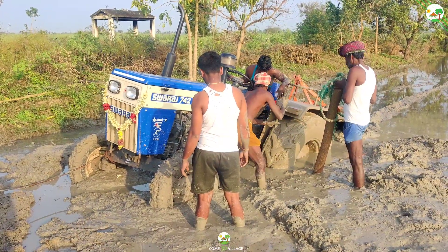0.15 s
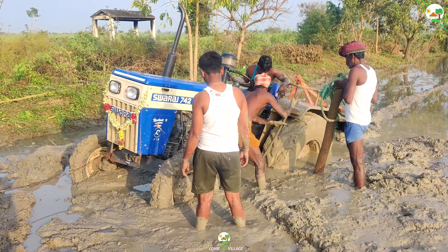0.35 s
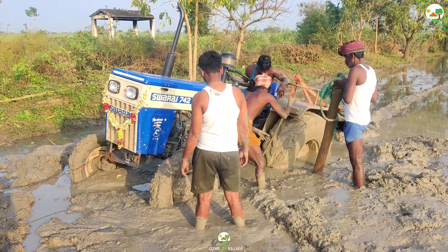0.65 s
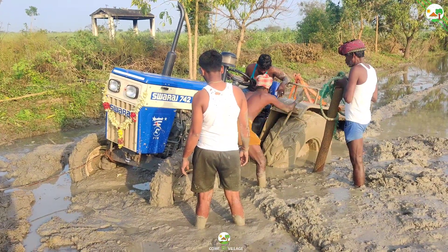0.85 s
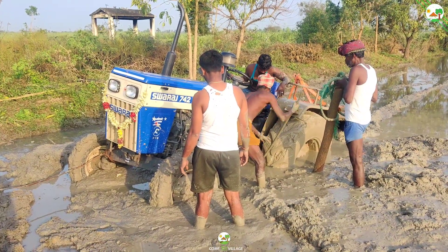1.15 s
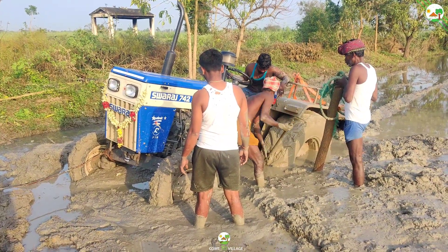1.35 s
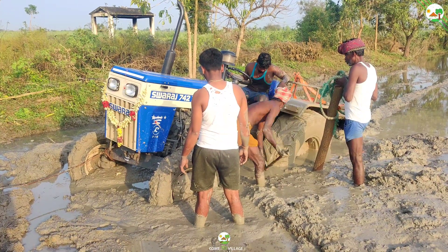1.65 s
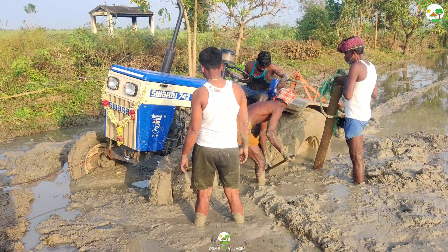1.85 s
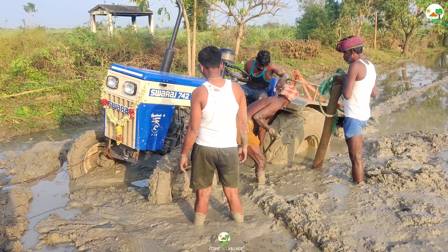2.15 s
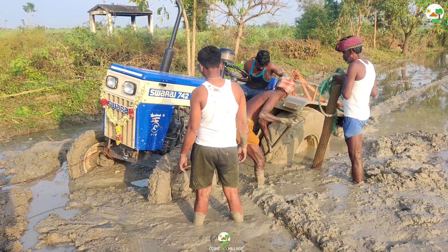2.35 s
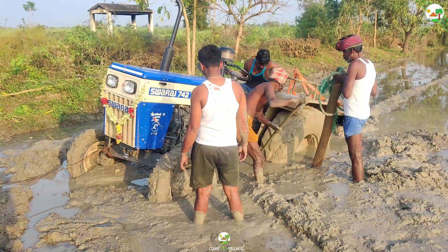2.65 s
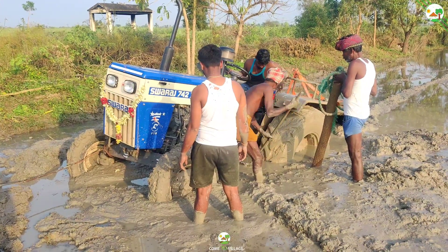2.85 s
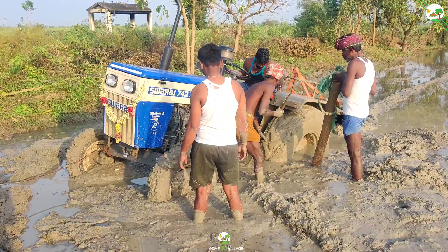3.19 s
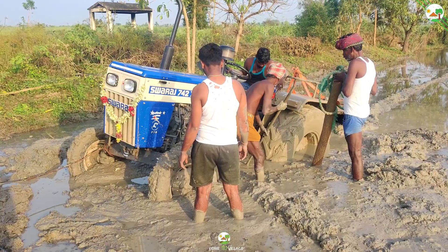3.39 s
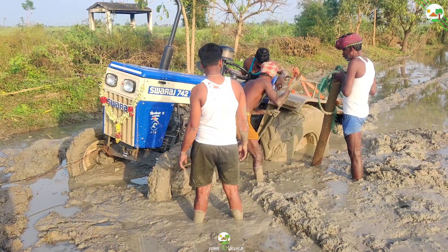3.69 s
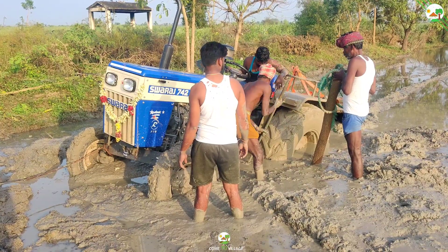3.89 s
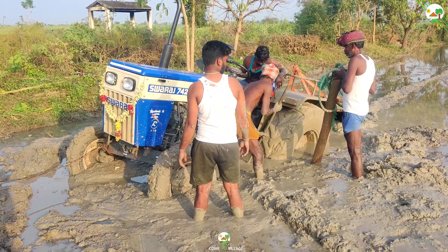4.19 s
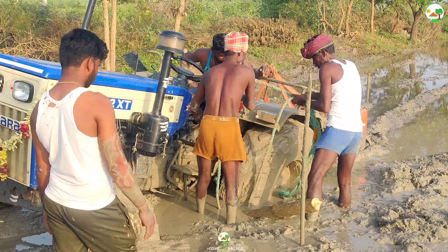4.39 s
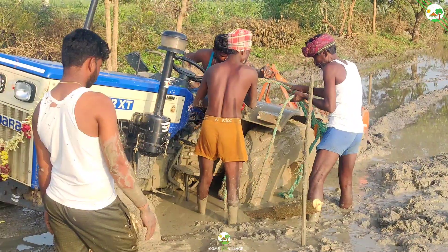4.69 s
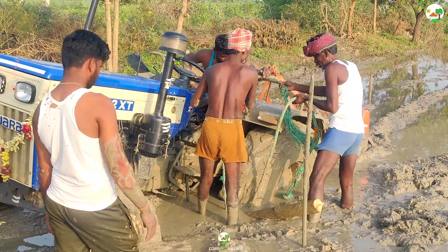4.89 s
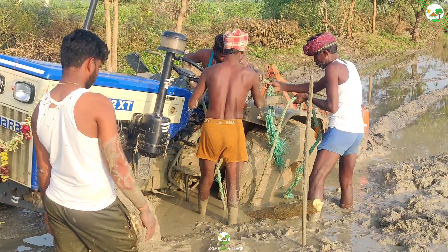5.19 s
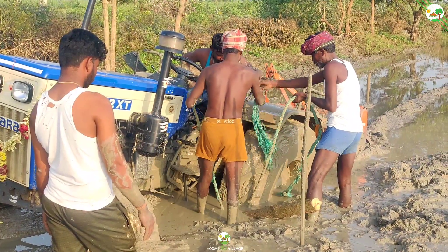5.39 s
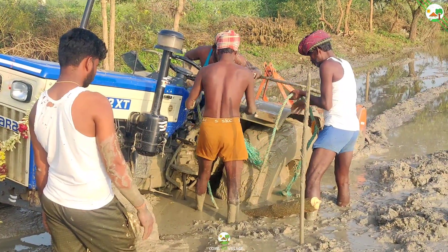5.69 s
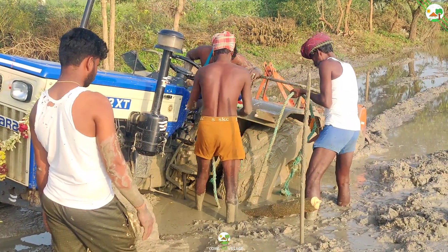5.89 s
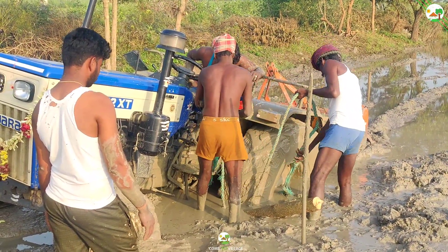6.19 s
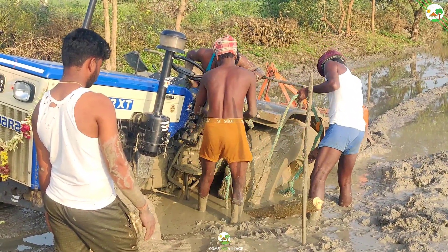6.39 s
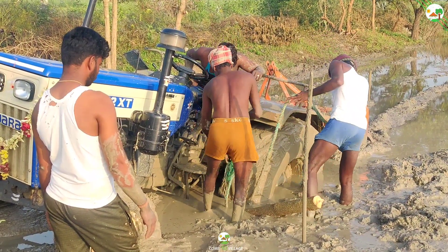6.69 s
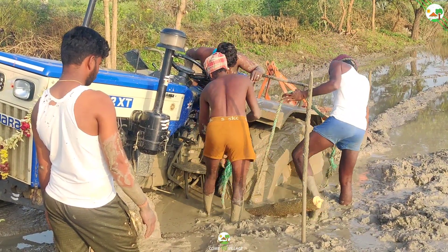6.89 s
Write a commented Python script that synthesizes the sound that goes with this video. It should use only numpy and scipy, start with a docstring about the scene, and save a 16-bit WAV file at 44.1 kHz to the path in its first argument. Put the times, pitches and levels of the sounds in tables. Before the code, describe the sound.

Mud squelches, metal clatters twice and water splashes in a breezy field; after a brief dropout and click, crickets and birds chirp.

```python
"""A stuck tractor in a muddy evening field

Mud plops as its cavities close, flung water hisses, and a loose metal part rattles in its own modes.
Crickets stroke their wings, small birds whistle among a few quick drip-like glides, and a far bird hoots
over a murmur, a rustle and a hum. Light wind buffets a phone's two microphone ports. The sound fades out
briefly, then returns while the microphones' bias swings and settles."""
import sys
import numpy as np
from scipy import signal
from scipy.fft import rfft, irfft, next_fast_len
from scipy.io import wavfile
from scipy.ndimage import uniform_filter1d, map_coordinates

SR = 44100
rng = np.random.default_rng(int(sys.argv[2]) if len(sys.argv) > 2 else 0)


def store_pcm(level_fs):
    """Save levels as 16-bit WAV."""
    pcm = np.round(np.clip(level_fs, -1, 1) * 32767).astype(np.int16)
    wavfile.write(sys.argv[1], SR, np.atleast_2d(pcm).T)


N = 310756

# Coherence of diffuse sound between the two ports: frequency_hz, correlation
DIFFUSE_COHERENCE = [(60, 0.99), (180, 0.93), (550, 0.26), (1650, -0.075), (4970, -0.028), (15000, -0.044)]
# Slow course of the background: time_s, breeze_db, murmur_db, rustle_db
BACKGROUND_LEVELS = [(0, -56, -54, -57.5), (.6, -54.5, -54, -57.5), (1.3, -57, -56, -58),
                     (1.55, -56, -55, -55), (1.9, -54, -56, -58.5), (2.6, -49, -55.5, -56.5),
                     (3.2, -50, -53.5, -53.5), (3.6, -51, -56, -57.5), (4.1, -43, -53, -54),
                     (4.35, -55, -53, -55), (4.6, -49, -54.5, -56), (5.05, -48, -52, -54),
                     (5.45, -50, -49, -53.5), (5.8, -49.5, -54, -54), (5.87, -57.5, -55, -58.5),
                     (6.5, -50.5, -56.5, -59), (7.05, -53, -54, -59)]


def amp(db):
    """Decibels as an amplitude ratio."""
    return 10 ** (np.asarray(db) / 20)


def unit(x):
    """Scales to an rms of 1."""
    return x / np.sqrt(np.mean(x ** 2) + 1e-20)


def along(points, hz):
    """Interpolates (frequency_hz, value) points on a log frequency axis."""
    knots_hz, values = np.transpose(points)
    return np.interp(np.log(hz + 1), np.log(knots_hz + 1), values)


def curves(rows, outside=None):
    """One value per sample for each column after the time."""
    times_s, *columns = np.transpose(rows)
    return [np.interp(np.arange(N) / SR, times_s, column, outside, outside) for column in columns]


def wobble(rate):
    """A smooth random curve, rate knots a second."""
    return map_coordinates(rng.standard_normal(int(N * rate / SR) + 4), [np.arange(N) * rate / SR])


def swell(start_s, rise_s, hold_s, fall_s):
    """Gain 1 from start_s for hold_s; 20 dB lower rise_s before and fall_s after."""
    t = np.arange(N) / SR - start_s
    return amp(-20 * np.maximum(0, np.maximum(-t / rise_s, (t - hold_s) / fall_s)))


def filtered(x, response):
    """Linear filtering: the spectrum times a complex frequency response."""
    size = next_fast_len(N + SR // 2)
    return irfft(rfft(x, size) * response(np.fft.rfftfreq(size, 1 / SR)), size)[..., :N]


def rush(spectrum, coherence, patchy_db):
    """Partly coherent stereo noise of rms 1, with patches of random gain in time and frequency."""
    cells = signal.stft(rng.standard_normal((2, N)), nperseg=512)[2]
    patches = uniform_filter1d(uniform_filter1d(rng.standard_normal(cells.shape[1:]), 6, 0), 8, 1)
    pair = signal.istft(cells * amp(patchy_db * unit(patches)), nperseg=512)[1][:, :N]
    turn = lambda hz: np.arccos(np.clip(along(coherence, hz), -1, 1)) / 2
    mid, side = filtered(pair, lambda hz: amp(along(spectrum, hz)) * [np.cos(turn(hz)), np.sin(turn(hz))])
    return unit(np.array([mid + side, mid - side]))


def add(out, start_s, sound, pan_db=0, lag=0):
    """Places a sound in both ports; the left one hears it lag samples later."""
    for side, (gain, shift) in enumerate([(amp(pan_db / 2), lag), (amp(-pan_db / 2), 0)]):
        span = out[side, round(start_s * SR) + shift:][:np.shape(sound)[-1]]
        span += gain * (sound if np.ndim(sound) == 1 else sound[side])[:len(span)]


def wind():
    """Turbulent pressure buffets the ports; a gust may strike one harder than the other."""
    spectrum = [(7.1, -21), (12, 6), (46, 7.5), (102, -12.5), (136, -17.5), (178, -14), (200, -18),
                (260, -54), (440, -120)]  # wind on a port: frequency_hz, density_db
    gusts = [(0.028, -47, 0.5, 0.043), (0.907, -50, 1, .01), (1.461, -43, 13, 0.019),
             (1.697, -49.5, -9, .04), (2.04, -41.5, -15, 0.031), (2.376, -45, -14, 0.051),
             (2.722, -40.5, -11.5, 0.035), (3.132, -45, -8.5, 0.054), (3.338, -48, -9, 0.019),
             (3.722, -38, -18.5, 0.024), (3.84, -42.5, 0, 0.14), (4.763, -44.5, 2.5, 0.073),
             (5.68, -47, 1, .06), (6.8, -53, -1, .05)]  # start_s, peak_db, left_minus_right_db, hold_s
    breeze_db, _, _ = curves(BACKGROUND_LEVELS)
    lumps = amp(1.5 * np.array([wobble(17), wobble(12)]))
    gust_gain = sum(amp(db + np.array([[pan_db], [-pan_db]]) / 2) * swell(start_s, 0.072, hold_s, 0.17)
                    for start_s, db, pan_db, hold_s in gusts)
    buffet = unit(lumps * rush(spectrum, coherence=[(20, 0.64), (120, 0.84)], patchy_db=0.64))
    return buffet * np.maximum(amp(breeze_db), gust_gain)


def murmur_and_rustle():
    """A diffuse sound field: a low murmur, and the rustle of leaves and wet mud."""
    murmur_spectrum = [(41, -17.5), (70, -0.5), (94, -1), (145, -6.5), (188, -8), (335, -15), (444, -19.5),
                       (479, -22), (800, -26), (1500, -36.5), (1950, -79), (3300, -120)]  # frequency_hz, density_db
    rustle_spectrum = [(410, -33.5), (700, -3.5), (969, -6.5), (1090, -11), (1700, -8), (2820, -7.5),
                       (4800, -6), (5760, -6.5), (7100, -7), (7700, -3), (8300, -8), (8800, -12),
                       (11500, -14), (14900, -11), (15700, -8.5)]  # frequency_hz, density_db
    _, murmur_db, rustle_db = curves(BACKGROUND_LEVELS)
    murmur = amp(murmur_db + 0.67 * wobble(10)) * rush(murmur_spectrum, DIFFUSE_COHERENCE, patchy_db=2.5)
    rustle = amp(rustle_db + 0.4 * wobble(14)) * rush(rustle_spectrum, DIFFUSE_COHERENCE, patchy_db=2.5)
    return murmur + rustle


def crickets():
    """Stridulation: two wing strokes a chirp, blurred by the grass; far crickets merge into a hiss."""
    chorus = [(5600, -44), (6050, -0.5), (6280, -2), (6450, -3), (6600, -9), (6770, -15), (7000, -24),
              (7400, -41)]  # far crickets: frequency_hz, density_db
    singers = [(.03, 4.2, .1705, 6750, -66.5, 0), (.085, 4.2, .18, 6480, -64.5, 0),
               (.035, 4.2, .175, 6230, -67, 0), (4.385, 7.0, .173, 6300, -59, -1.5),
               (4.435, 7.0, .169, 6770, -61, -2.5), (4.525, 5.05, .157, 6780, -61, 0),
               (4.49, 7.0, .168, 6440, -64, -2.5)]  # near crickets: start_s, end_s, period_s, pitch_hz, level_db, drift_db_per_s
    out = amp(-71 + 1.6 * wobble(20)) * rush(chorus, [(1000, 0.0059)], patchy_db=3.0)
    t = np.arange(round(.034 * SR)) / SR
    for start_s, end_s, period_s, hz, db, drift in singers:
        for chirp_s in np.arange(start_s, end_s, period_s):
            for gap_s in (0, .044):
                blur = np.cumsum(rng.normal(0, .035, (2, len(t))), axis=1)
                phase = 2 * np.pi * hz * t + blur + rng.uniform(0, 2, (2, 1))
                onset_s = chirp_s - .017 + gap_s + rng.normal(0, .003)
                gain = amp(db + drift * (chirp_s - start_s) + rng.normal(0, 2))
                add(out, onset_s, gain * np.sqrt(np.hanning(len(t))) * np.sin(phase), pan_db=-6)
    return out


def spray():
    """Flung water: countless drops sum to a flickering hiss, with the heavier slop under it."""
    splashes = [(0.023, -46.5, -46, 0.067, .015, 0.066), (3.154, -34, -61, .004, 0.008, 0.053),
                (3.225, -39.5, -73.5, 0.045, 0.0044, 0.1), (3.256, -44.5, -45.5, .015, 0.024, 0.013)]  # start_s, hiss_db, slop_db, rise_s, hold_s, fall_s
    mist_spectrum = [(880, -17), (1500, -16), (2300, -8.5), (2980, -2.5), (4210, -2), (5990, -2.5),
                     (9800, -9), (15700, -6)]  # frequency_hz, density_db
    slop_spectrum = [(120, -18), (250, 7), (500, -6), (1000, -8), (2200, -14.5), (4000, -28)]  # frequency_hz, density_db
    hiss_gain, slop_gain = sum(amp([[hiss_db], [slop_db]]) * swell(start_s, *shape)
                               for start_s, hiss_db, slop_db, *shape in splashes)
    hiss = rush(mist_spectrum, [(1000, 0.0093)], patchy_db=2.0) * amp(1.2 * wobble(250))
    slop = rush(slop_spectrum, DIFFUSE_COHERENCE, patchy_db=1.8)
    return hiss_gain * hiss + slop_gain * slop


def mud_plops():
    """Cavity resonance: a closing pocket rings briefly; mud squelches, spatters and lands with a thud."""
    plops = [(.033, -42, 260, .12, -58, -70), (0.323, -30, 1076, 0.024, -43, -54.5),
             (.495, -53, 4560, .02, -53.5, -70), (.678, -24, 1710, .022, -45, -50.5),
             (.692, -38, 1560, .05, -53, -65), (.784, -56, 2140, 0.067, -62, -66),
             (.865, -56, 4980, .012, -54.5, -54.5), (.895, -53, 810, .025, -74, -54),
             (1.047, -37, 1070, 0.02, -49.5, -52.5), (1.52, -47, 2170, 0.027, -45.5, -67),
             (1.528, -46, 251, 0.13, -60, -75), (1.916, -40.5, 1080, 0.033, -56.5, -69),
             (2.14, -49, 4670, 0.022, -60, -62), (2.674, -44, 773, .045, -70, -74),
             (2.8, -45, 1310, .025, -55, -63), (3.255, -40.5, 251, 0.13, -57, -70),
             (3.437, -51, 900, .026, -75, -61), (4.17, -40, 4400, 0.016, -47, -58),
             (5.154, -47, 715, .014, -55, -47), (5.393, -46, 4480, .01, -52, -66),
             (5.505, -47, 810, .02, -55, -62)]  # start_s, note_db, pitch_hz, note_t60_s, squelch_db, spatter_db
    thuds = [(.865, -55), (.895, -52.5), (1.52, -46), (2.799, -64), (5.393, -56), (5.505, -53.5)]  # heavy mud landing: start_s, level_db
    out, t = np.zeros((2, N)), np.arange(SR // 5) / SR
    noise = lambda: rng.standard_normal(len(t)) + rng.standard_normal((2, len(t)))  # shared + each port's
    band = lambda *hz: unit(signal.sosfilt(signal.butter(2, hz, "band", fs=SR, output="sos"), noise()))
    decay = lambda t60_s: amp(-60 * t / t60_s) * (1 - np.exp(-t / 0.00057))
    for start_s, db, hz, t60_s, squelch_db, spatter_db in plops:
        note = amp(db) * np.sin(2 * np.pi * hz * t) * decay(t60_s)
        squelch = amp(squelch_db) * band(0.45 * hz, 2.15 * hz) * decay(t60_s=.12)
        spatter = amp(spatter_db) * band(2500, 20000) * decay(t60_s=.15)
        add(out, start_s, note + squelch + spatter, lag=-17)
    for start_s, db in thuds:
        add(out, start_s, amp(db) * band(100, 540) * decay(t60_s=0.17), lag=-17)
    return out


def hooting_bird():
    """A far bird hoots in phrases of up to five damped tones, each sagging slightly in pitch."""
    phrase = [(0, -56), (.335, -58.5), (.65, -55.5), (.985, -56), (1.305, -53)]  # the hoots of a phrase: offset_s, level_db
    phrase_starts_s, end_s, pitch_hz = [.228, 1.94, 3.668], 4.2, 450
    out, t = np.zeros((2, N)), np.arange(round(.15 * SR)) / SR
    envelope = amp(-60 * t / .5) * np.sin(np.pi * t / t[-1]) ** 0.16
    phase = 2 * np.pi * pitch_hz * t * (1 - 0.095 * t)
    for start_s in phrase_starts_s:
        for offset_s, db in phrase:
            if start_s + offset_s < end_s:
                blur = np.cumsum(rng.normal(0, .03, len(t)))
                add(out, start_s + offset_s, amp(db) * envelope * np.sin(phase + blur), lag=-11)
    return out


def hum():
    """A low tone wavers by slow random modulation of frequency and amplitude."""
    levels = [(0.85, -70), (0.958, -56), (1.942, -69), (1.998, -60), (2.7, -61)]  # time_s, level_db
    level_db, = curves(levels, outside=-120)
    pitch_hz = 183 + 4 * wobble(6)
    return amp(level_db + 2.5 * wobble(8)) * np.sin(2 * np.pi * np.cumsum(pitch_hz) / SR)


def whistles_and_blips():
    """Frequency sweeps, roughened and echoed: bird whistles and a few quick bubble- or drip-like glides."""
    glides = [(.868, .02, 4500, 3780, -61), (1.2, .03, 4600, 3160, -62), (1.562, .028, 4600, 4240, -58),
              (1.58, 0.16, 7600, 5740, -61), (2.386, 0.022, 4940, 4980, -56.5),
              (2.465, .02, 4500, 4800, -60), (2.532, .025, 4660, 5020, -63), (2.566, .011, 3120, 2160, -54),
              (2.612, .009, 2860, 2260, -55.5), (2.679, 0.0082, 2380, 3740, -50.5),
              (2.73, 0.022, 4600, 4650, -60), (2.805, 0.024, 5050, 5320, -54),
              (2.886, 0.013, 3500, 4530, -52.5), (2.909, 0.047, 4700, 5060, -56),
              (3.32, .038, 7800, 7050, -55), (4.669, .087, 2900, 3200, -61), (5.393, .035, 4400, 4750, -56),
              (4.75, .04, 3150, 2680, -62), (5.95, .32, 4940, 5600, -67)]  # whistles and drip-like blips: start_s, length_s, start_hz, end_hz, level_db
    calls = [(4.594, -55.5, -53), (4.86, -57, -52), (5.141, -68, -47), (5.42, -62, -53), (5.71, -57, -54.5)]  # a two-note bird: start_s, rising_db, falling_db
    rising, falling = (0.021, 4200, 4850), (.018, 6700, 4700)  # length_s, start_hz, end_hz
    out, notes = np.zeros((2, N)), list(glides)
    for start_s, rising_db, falling_db in calls:
        notes += [(start_s, *rising, rising_db), (start_s + .047, *falling, falling_db)]
    for start_s, length_s, start_hz, end_hz, db in notes:
        hz = np.linspace(start_hz, end_hz, round(length_s * SR))
        for delay_s, echo_db in [(0, 0), (.009, -13)]:
            blur = np.cumsum(rng.normal(0, .05, (2, len(hz))), axis=1)
            glide = np.sqrt(np.hanning(len(hz))) * np.sin(2 * np.pi * np.cumsum(hz) / SR + blur)
            add(out, start_s + delay_s, amp(db + echo_db) * glide)
    return out


def rattle():
    """Modal ringing: small contacts and harder knocks excite the loose metal part; its edge scrapes."""
    modes = [(876, 127, 0), (1540, 96, -1), (1870, 115, -2), (2670, 130, 0), (3250, 150, -2.5),
             (3770, 140, -3.5), (5040, 100, -14), (7600, 300, -12)]  # the part's resonances: centre_hz, width_hz, level_db
    shakes = [(3.04, -43, -40.5, 0.038, 0.086), (3.986, -55, -46.5, .003, .03),
              (4.041, -40.5, -34, 0.042, 0.054)]  # peak_s, rattle_db, scrape_db, rise_s, fall_s
    knocks = [(2.999, -41, 876), (3.026, -42, 876), (3.037, -29, 2670), (3.04, -36, 876),
              (3.069, -39, 1540), (3.076, -33, 2670), (3.105, -47, 876), (3.157, -28.5, 2670),
              (3.159, -33, 5040), (3.985, -38, 876), (3.987, -38.5, 5040), (4.026, -31, 876),
              (4.031, -36, 1540), (4.032, -33.5, 1870), (4.035, -31.5, 2670), (4.046, -30, 3250),
              (4.067, -54, 876), (4.112, -49, 876), (4.115, -54, 1870)]  # start_s, level_db, struck_mode_hz
    scrape_spectrum = [(500, -42.5), (1000, -18), (2000, -4), (4000, 2.5), (8000, -3.5), (12000, -7),
                       (15700, -6)]  # frequency_hz, density_db
    shake_gain, scrape_gain = sum(amp([[rattle_db], [scrape_db]]) * swell(peak_s, rise_s, 0, fall_s)
                                  for peak_s, rattle_db, scrape_db, rise_s, fall_s in shakes)
    ring = lambda f: sum((-1) ** k * amp(db) * 1j * f * width / (hz * hz - f * f + 1j * f * width)
                         for k, (hz, width, db) in enumerate(modes))
    forces = rng.standard_normal(N) + 0.49 * rng.standard_normal((2, N))
    contacts = forces * (rng.random(N) < .03)
    chatter = filtered(shake_gain * contacts / np.std(filtered(contacts, ring)), ring)
    out = scrape_gain * rush(scrape_spectrum, [(1000, 0)], patchy_db=1.0)
    add(out, 0, chatter, lag=1)
    t = np.arange(SR // 10) / SR
    attack = 1 - np.exp(-t / 0.00081)
    for start_s, db, struck_hz in knocks:
        ringing = 0
        for hz, width, _ in modes:
            gain = amp(rng.normal(0, 1.1) - 31.4 * abs(np.log2(hz / struck_hz)))  # far modes are weaker
            ringing += gain * np.exp(-np.pi * .75 * width * t) * np.sin(2 * np.pi * hz * t)
        add(out, start_s, amp(db) * attack * ringing, lag=1)
    return out


def bias_settling():
    """Transient response: each microphone's bias wakes with a step, swings and creeps back to rest."""
    # left, right: wake_s, step_size, swing_size, swing_decay_s, swing_hz, creep_size, creep_decay_s
    ports = [(4.4492, .008, .34, .299, .85, .173, .4), (4.4598, .013, 1.39, .091, 1.815, .44, .25)]
    settle_s, lift_s, drop_s = 4.474, 4.505, 4.5231
    t = np.arange(N) / SR
    age, out = np.maximum(t - settle_s, 0), []
    for wake_s, step, size, decay_s, hz, creep, creep_s in ports:
        wake = step * np.clip((t - wake_s) / .0002, 0, 1) * np.exp(-abs(t - wake_s) / .1)
        phase = 2 * np.pi * hz * age
        swing = np.exp(-age / decay_s) * (size * np.sin(phase) + creep * np.cos(phase))
        out.append(wake + swing - creep * np.exp(-age / creep_s))
    lift = .19 * np.clip((t - lift_s) / .018, 0, 1) * (t < drop_s)  # its sudden drop is a click
    return np.array(out) * (1 + lift)


def scene():
    """Superposition of all sources at the two ports."""
    return (wind() + murmur_and_rustle() + crickets() + spray() + mud_plops()
            + hooting_bird() + hum() + whistles_and_blips() + rattle())


def record(dry):
    """The gain fades out and back in, the settling bias is added, and a low-pass limits the band."""
    fade = [(4.12, 0), (4.268, -10), (4.272, -69), (4.346, -69), (4.358, -21), (4.53, 0)]  # time_s, gain_db
    fade_db, = curves(fade)
    return filtered(dry * amp(fade_db) + bias_settling(), lambda hz: hz < 15750)


dry = scene()
out = record(dry)
store_pcm(out)
```